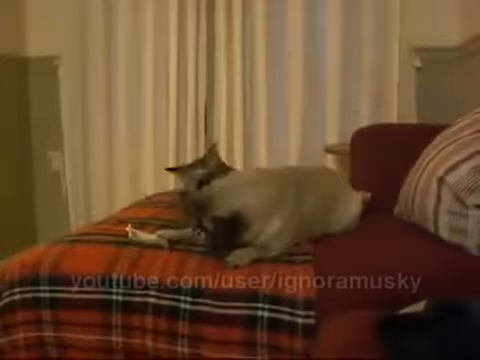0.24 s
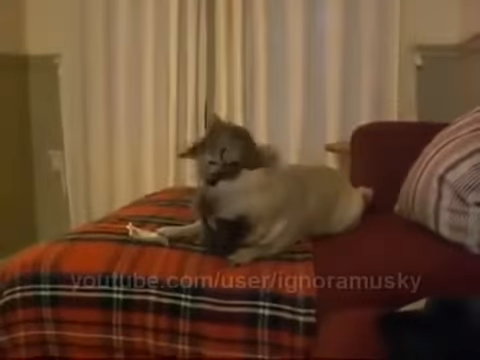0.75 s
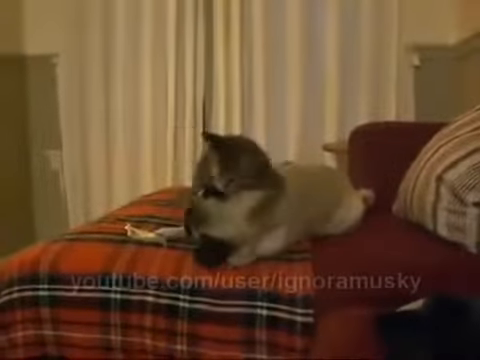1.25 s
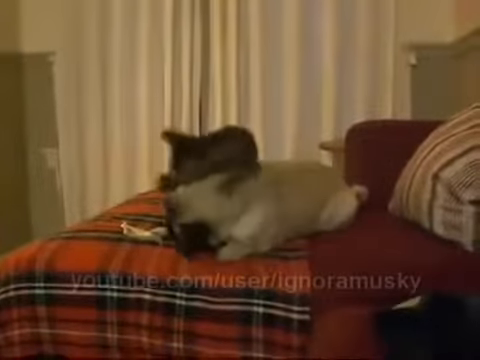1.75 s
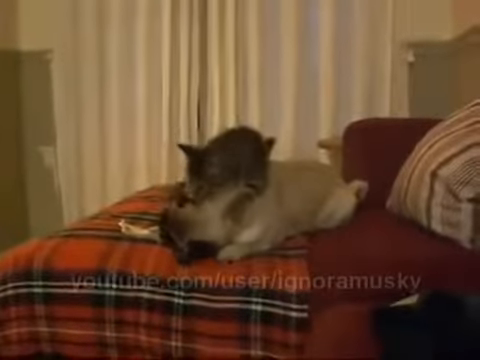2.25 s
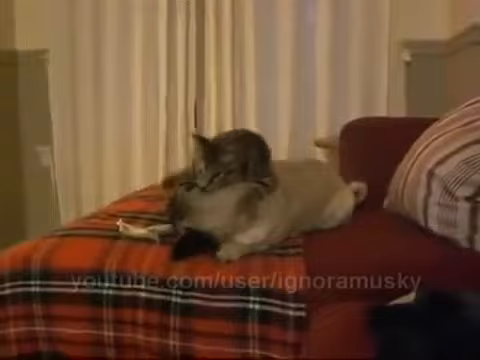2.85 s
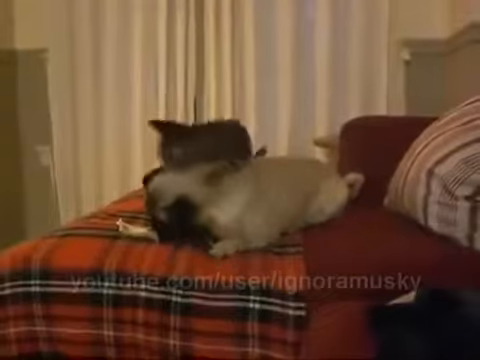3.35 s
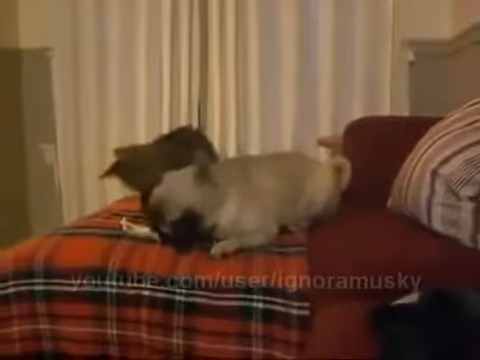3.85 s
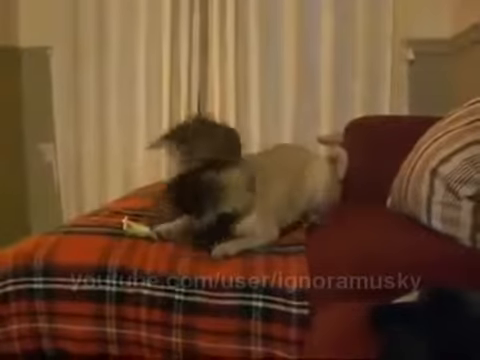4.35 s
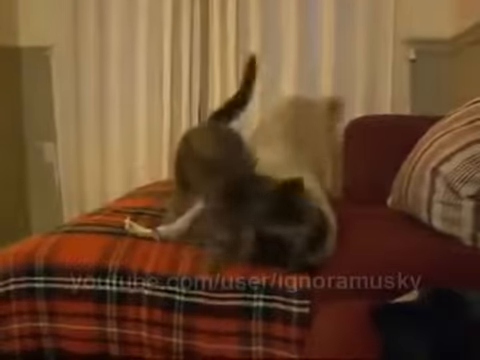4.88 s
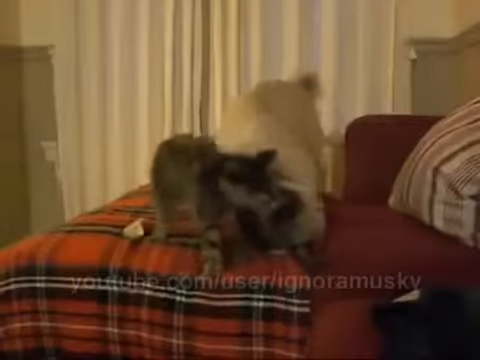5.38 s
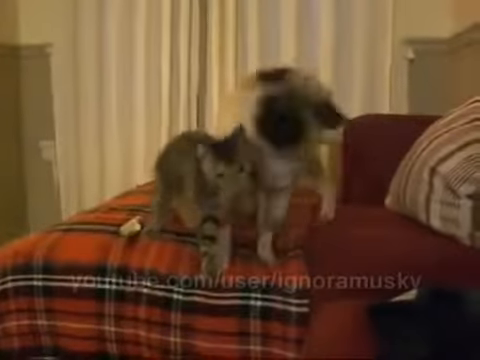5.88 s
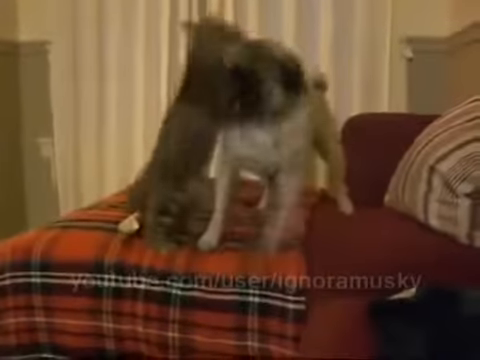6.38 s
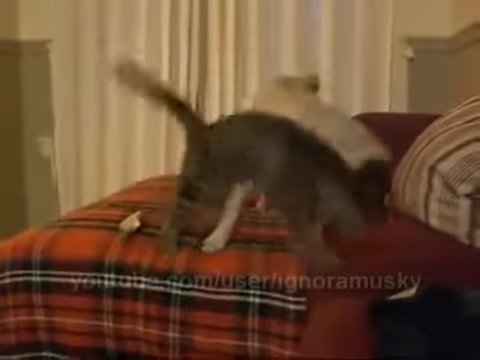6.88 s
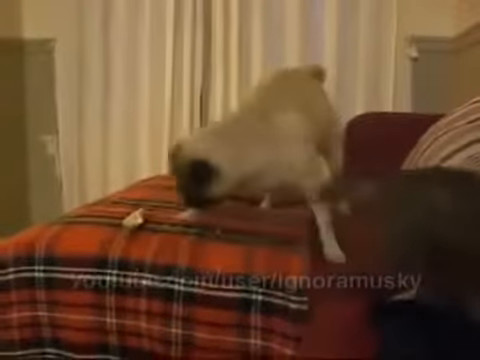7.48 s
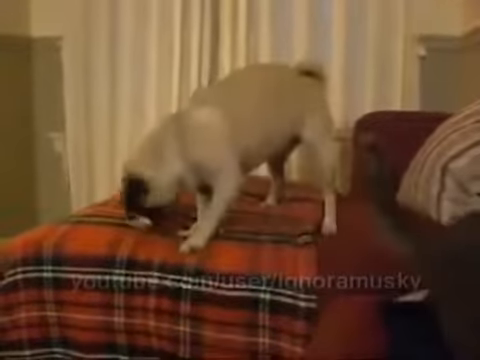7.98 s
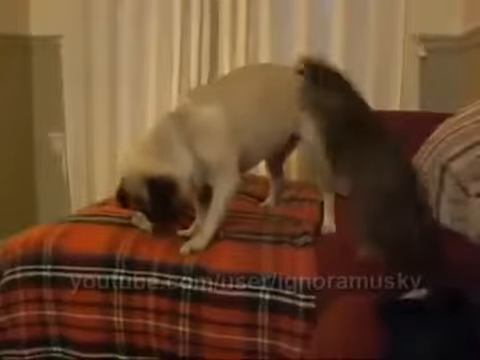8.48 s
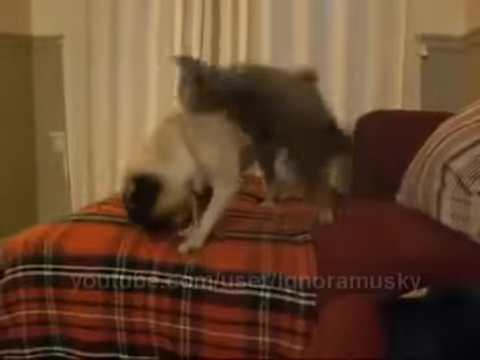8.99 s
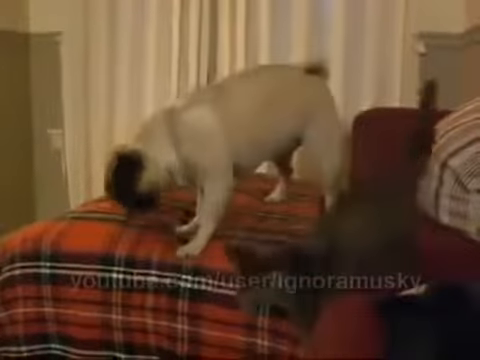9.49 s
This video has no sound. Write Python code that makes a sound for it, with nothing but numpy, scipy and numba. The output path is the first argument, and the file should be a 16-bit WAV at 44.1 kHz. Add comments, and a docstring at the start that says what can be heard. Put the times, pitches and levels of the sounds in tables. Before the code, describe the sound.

A brief hiss opens onto a cluster of low, fluttering cat growls. Quieter, sparser growling follows, then a snarl that thins to a whine and wavering moan. A louder yowl swells and sinks, a gap follows, and a last yowl breaks sharply upward. Lip smacks, ticks and soft thuds dot the scuffle. The microphone is a few steps away in a small living room with low hum.

```python
"""An opening hiss, short growls and three long yowls: a cat and a small dog wrestle on a living-room sofa.
Each call is a rough low tone, chopped by a throat flutter, that turns into a rasping snarl as the jaw opens:
pulses and chopped air drive throat and mouth resonances. Coloured noise makes the hiss, the lip smacks and
short ticks with soft thuds, some at the starts of calls. The hiss falls away, then returns very faintly.
Reflections surround the scuffle; the room hums quietly."""
import sys
import numpy as np
from scipy import signal
from scipy.fft import rfft, irfft, next_fast_len
from scipy.io import wavfile
from scipy.ndimage import uniform_filter1d, map_coordinates
from numba import njit

SR = 44100
rng = np.random.default_rng(int(sys.argv[2]) if len(sys.argv) > 2 else 0)


def generate_wav(sig):
    """Save sig (samples, or channels by samples) to the path in sys.argv[1] as 16-bit PCM at SR."""
    pcm = np.round(np.clip(np.atleast_2d(sig).T, -1, 1) * 32767).astype(np.int16)
    wavfile.write(sys.argv[1], SR, pcm)


N = 429093

WAVER, WAVER_PER_S = 0.048, 13  # jaw and tongue tremble: share of the resonance, curve knots per second
WHINE_SHARE = 0.91  # share of the rasp that a fully raised tongue would turn into a whine, before the limit
FOCUS_MUTES_DB = 23  # a raised tongue shuts off the throat's sound
SNAP_DB = 4  # height of a flap's burst at full roughness
# Pressing harder stiffens the throat. Each row: effort in dB, share of the flutter left.
FLUTTER_LEFT = [(-19, 1), (-15.5, .4)]


def growl():
    """Source-filter principle: fold pulses and chopped air excite the resonances of throat and mouth."""
    (effort_db, opening, pitch_hz, rough, mouth_hz, focus,
     extra_rasp_db, throat_hz, extra_throat_db) = voice_controls()
    rough, focus, narrow = np.clip([rough, focus, WHINE_SHARE * focus ** 2], 0, .95)
    chest_db, throat_db, mouth_db, rasp_db = jaw_balance(effort_db, opening)
    throat_db = throat_db + extra_throat_db - FOCUS_MUTES_DB * focus ** 2
    rasp_db = rasp_db + extra_rasp_db
    throat_hz = throat_hz * np.exp(WAVER * wobble(WAVER_PER_S))
    # a raised tongue holds still
    mouth_hz = mouth_hz * np.exp(WAVER * (1 - focus) * wobble(WAVER_PER_S))

    flaps, bursts = flutter(rate=30, scatter=.17)
    flutter_left = np.interp(effort_db, *np.transpose(FLUTTER_LEFT))
    flaps, bursts = flutter_left * flaps, flutter_left * bursts
    snap_db = SNAP_DB * rough * bursts

    cycles = fold_cycles(pitch_hz, rough, flaps)
    air = chopped_air(cycles)
    source = fold_source(cycles, air, rough, flaps)
    chest = chest_tone(cycles, air, pitch_hz, rough, flaps) * amp(chest_db)
    throat = resonance(source, throat_hz, width_hz=260) * amp(throat_db)
    mouth = mouth_sound(source, throat_hz, mouth_hz, throat_db, mouth_db, focus)
    rasp = snarl_rasp(source, cycles, flaps, mouth_hz, narrow) * amp(rasp_db)
    return chest + throat + mouth * amp(0.5 * snap_db) + off_sofa(rasp * amp(snap_db))


# Short growls. Each row: start in seconds, attack in seconds, length in seconds, release in seconds,
# effort in dB, sag over the length in dB, jaw opening 0-1, pitch in Hz, roughness 0-1, mouth resonance in Hz,
# focus 0-1 (how far the tongue narrows the mouth to a ring), extra rasp in dB, throat resonance in Hz,
# extra throat in dB.
SHORT_GROWLS = [ (0.158, 0.13, 0.15, 0.6, -23, -1.5, 0.57, 168, 0.58, 834, 0.1, 4.5, 416, -5),
                (0.439, 0.25, 0.092, 0.22, -21, 4.5, 0.67, 170.8, 0.63, 1013, 0.08, 0, 377, -5.5),
                (0.634, 0.13, 0.15, 0.37, -17.5, 6, 0.61, 200.2, 0.67, 1023, 0.23, 2, 413, 1),
                (0.9146, 0.003, 0.065, 0.12, -16, 3.5, 0.73, 156.2, 0.44, 927, 0.73, -2, 390, 7.5),
                (0.996, 0.06, 0.045, 0.18, -20, 2.5, 0.4, 160, 0.48, 1040, 0.35, 4, 360, -4.5),
                (1.154, 0.09, 0.6, 0.15, -41, 1.5, 0.91, 165.4, 0.75, 1300, 0.08, -3.5, 390, -6),
                (2.24, 0.021, 0.36, 0.13, -27.5, -3, 0.44, 211.9, 0.43, 855, 0.43, -0.5, 440, 0.5),
                (2.75, 0.12, 0.12, 0.37, -17.5, -0.5, 0.83, 207.9, 0.64, 930, 0.19, -4, 404.3, 1),
                (2.901, 0.091, 0.13, 0.7, -18, 4.5, 0.53, 362, 0.58, 900.3, 0.31, -0.5, 385.9, -1),
                (3.101, 0.09, 0.26, 0.19, -26, 4, 0.89, 190.1, 0.64, 1024, 0.2, -5.5, 387, 0),
                (3.88, 0.18, 0.27, 0.14, -19.5, -1.5, 0.32, 243.9, 0.38, 1000, 0.46, -0.5, 352, -4),
                (6.046, 0.064, 0.108, 0.011, -27.5, 0, 0.32, 275, 0.3, 1130, 0.36, -3.5, 469.7, 1.5),
                (8.155, 0.093, 0.35, 0.061, -21, 2, 0.26, 221.7, 0.43, 960.3, 0.21, -2.5, 505, 5),
                (8.56, 0.081, 0.051, 0.26, -28, 2, 0.18, 205.6, 0.42, 978.7, 0.22, 4, 460.7, 4.5),
                (9.495, 0.046, 0.062, 0.17, -26, -1, 0.82, 234.6, 0.72, 919.8, 0.12, 3, 491, 2.5),
                (9.594, 0.14, 0.12, 0.21, -19.5, -1.5, 0.52, 243.3, 0.46, 962.4, 0.2, 0.5, 410, -0.5), ]
# Three yowls, each a gesture: a snarl that narrows to a whine and trails off as a wavering moan; a call whose
# jaw opens twice as the pitch climbs and sinks; a low growl that breaks upward by nearly an octave.
# Each row: time in seconds, effort in dB, jaw opening 0-1, pitch in Hz, roughness 0-1, mouth resonance in Hz,
# focus 0-1, extra rasp in dB, throat resonance in Hz, extra throat in dB.
LONG_YOWLS = [
    [(4.29, -23, 0.61, 240.5, 0.58, 920, 0.3, 3, 521, -2),
     (4.345, -18, 0.82, 252.4, 0.56, 915, 0.2, -6, 480, 4),
     (4.46, -19, 0.65, 248.9, 0.52, 1050, 0.48, -3.5, 434, 5),
     (4.53, -23.5, 0.6, 248.5, 0.74, 1110, 0.65, 1, 405, 0),
     (4.68, -24, 0.73, 245.1, 0.87, 1150, 0.39, 1, 343, -1),
     (4.84, -35, 0.45, 235.5, 0.48, 1209, 0.34, 3, 339.8, -5),
     (4.91, -27.5, 0.29, 245, 0.43, 1329, 1, 7, 330, -4),
     (4.97, -23, 0.24, 268.3, 0.25, 1350, 0.97, 4.5, 330, -9),
     (5.065, -28, 0.37, 258.8, 0.27, 1320, 1, -2, 320, -10),
     (5.1, -33, 0, 222, 0.26, 1320, 0.39, 4, 320, -2),
     (5.21, -30.5, 0.21, 250.1, 0.33, 1521, 0.93, 3.5, 322.4, -18),
     (5.4, -41.5, 0.27, 193.4, 0.45, 1608, 0.99, 5, 328.8, -2),
     (5.55, -32.5, 0.1, 213.1, 0.3, 1648, 0.78, 2.5, 348, 2),
     (5.74, -31.5, 0.01, 242.2, 0.17, 1600, 0.6, -15, 350, -11.5),
     (5.88, -39, 0.02, 273.5, 0.18, 1565, 0.66, -33, 343, -14)],
    [(6.34, -24, 1, 262.7, 0.45, 1005, 0.29, -7.5, 541.4, 6.5),
     (6.37, -16, 1, 254.8, 0.6, 1057, 0.3, -2, 490, 1),
     (6.46, -15.5, 0.7, 245.5, 0.59, 979.6, 0.18, -6, 410, -1),
     (6.53, -12.5, 0.46, 270.2, 0.37, 941, 0.28, 1, 384.7, -4),
     (6.62, -13.5, 0.99, 295, 0.78, 890, 0.3, -3.5, 514, 2),
     (6.73, -13.5, 1, 334.5, 0.79, 878, 0.2, -4, 500, -2),
     (6.83, -12.5, 0.59, 312.1, 0.48, 844, 0.27, 0.5, 350, -5.5),
     (6.98, -14, 0.47, 304.2, 0.4, 860.6, 0.24, -7, 340, -10),
     (7.04, -21, 0.57, 299.7, 0.39, 924, 0.41, -7.5, 369.7, 3),
     (7.11, -16, 0.55, 262, 0.71, 925, 0.45, 0.5, 385, 0),
     (7.3, -15.5, 0.4, 261.5, 0.56, 973, 0.47, -5, 348.1, -8),
     (7.38, -19.5, 0.44, 254.7, 0.5, 1018, 0.7, -5.5, 350, -4),
     (7.47, -26.5, 0.34, 226, 0.55, 1006, 0.41, -4, 360.3, -0.5)],
    [(8.72, -25, 0.69, 175, 0.58, 1517, 0.17, -5.5, 459.6, 0),
     (8.775, -16, 0.41, 178, 0.4, 1550, 0.43, -0.5, 470, 0.5),
     (8.82, -17.5, 0.51, 189.2, 0.55, 1529, 0.03, 3, 517, -3),
     (8.84, -17, 0.63, 189.6, 0.61, 1000, 0.14, 1.5, 560, 0),
     (8.9, -14.5, 1, 185.5, 0.67, 975, 0.34, -1.5, 620, 4),
     (8.93, -13, 0.67, 325, 0.52, 908.7, 0.3, -1.5, 621, -0.5),
     (9.03, -13.5, 0.78, 345.2, 0.51, 880, 0.2, -1, 616, -7),
     (9.11, -13, 0.74, 358, 0.71, 915, 0.34, 0.5, 650, 0.5),
     (9.22, -16.5, 0.55, 344.1, 0.67, 880, 0.2, -0.5, 610, -3),
     (9.38, -15.5, 0.58, 390.7, 0.67, 925, 0.61, -5, 558.4, 1),
     (9.44, -23.5, 0.42, 379.2, 0.77, 960, 0.51, -0.5, 450, -4)],
]
YOWL_ATTACK_S, YOWL_RELEASE_S = 0.081, 0.13


def voice_controls():
    """Articulation as control curves: the strongest call sets the effort, all calls' points set the rest."""
    calls = [(growl_gesture(start, length, *rest), attack, release)
             for start, attack, length, release, *rest in SHORT_GROWLS]
    calls += [(yowl, YOWL_ATTACK_S, YOWL_RELEASE_S) for yowl in LONG_YOWLS]
    effort_db = np.max([envelope(*call) for call in calls], axis=0)
    shapes = sorted((s, *shape) for gesture, _, _ in calls for s, _, *shape in gesture)
    return [effort_db, *curves(shapes)]


PITCH_SAG = 0.04  # share by which a growl's pitch starts high and ends low


def growl_gesture(start, length, effort_db, sag_db, opening, pitch_hz, *shape):
    """Declination: effort and pitch drift along a short growl while the mouth holds its shape."""
    return [(start, effort_db, opening, pitch_hz * (1 + PITCH_SAG), *shape),
            (start + length, effort_db - sag_db, opening, pitch_hz * (1 - PITCH_SAG), *shape)]


FADE_DB = 29  # a call rises from, and dies to, this far below its effort


def envelope(gesture, attack_s, release_s):
    """Exponential onset and decay: effort is linear in dB, with silence outside the call."""
    s, db = np.transpose(gesture)[:2]
    times = [s[0] - attack_s, *s, s[-1] + release_s]
    levels = [db[0] - FADE_DB, *db, db[-1] - FADE_DB]
    return np.interp(np.arange(N) / SR, times, levels, left=-np.inf, right=-np.inf)


# Balance at three jaw openings. Columns: chest tone, throat, mouth and rasp, each in dB against the effort.
SHUT_BALANCE = (-1.5, -18.5, -26.5, -24)
HALF_OPEN_BALANCE = (-3, -4, -9.5, -15)
WIDE_BALANCE = (-9, -2.5, -2.5, -7)


def jaw_balance(effort_db, opening):
    """Radiation through the jaw: opening it moves the sound from the chest into the mouth."""
    parts = zip(SHUT_BALANCE, HALF_OPEN_BALANCE, WIDE_BALANCE)
    return [effort_db + np.interp(opening, [0, .5, 1], part) for part in parts]


SNAP_LIFE, SNAP_SCATTER = 0.26, 0.65  # a burst's decay as a share of its flap, spread of heights


def flutter(rate, scatter):
    """Relaxation oscillation: loose tissue flaps unevenly, opening fast with a burst and closing slowly."""
    turns = np.cumsum(rate * np.exp(scatter * wobble(25))) / SR
    sizes = np.abs(1 + SNAP_SCATTER * rng.standard_normal(size=1000))
    bursts = sizes[turns.astype(int)] * np.exp(-(turns % 1) / SNAP_LIFE)
    flaps = np.sin(2 * np.pi * turns) + 0.083 * np.sin(4 * np.pi * turns)
    return flaps, bursts - bursts.mean()


def fold_cycles(pitch_hz, rough, flaps):
    """Frequency modulation: the pitch jitters with roughness and lifts a little on each flap."""
    jitter = rough * (.12 * wobble(220) + .05 * wobble(45))
    return np.cumsum(pitch_hz * np.exp(jitter + .015 * flaps)) / SR


CHOP_DB = 5  # depth to which the folds chop the air


def chopped_air(cycles):
    """Amplitude modulation: the folds chop turbulent air once a cycle."""
    return unit(rng.standard_normal(N) * amp(CHOP_DB * np.cos(2 * np.pi * cycles)))


LIMP_DB = 3.5  # strong and weak beats alternate by this swing either way, at full roughness


def fold_source(cycles, air, rough, flaps):
    """Glottal excitation: uneven pulses give way to chopped air as roughness grows, with a subharmonic limp."""
    pulses = unit(np.diff(np.floor(cycles), prepend=0) * amp(4.7 * wobble(250)))
    mix = np.sqrt(1 - rough ** 3) * pulses + rough ** 1.5 * air
    limp_db = LIMP_DB * rough * np.cos(np.pi * cycles)
    return mix * amp(2.6 * flaps + 1.4 * wobble(90) + limp_db)


RAGGED = 1.33  # ragged cycles beside the clean chest tone, at full roughness


def chest_tone(cycles, air, pitch_hz, rough, flaps):
    """Fundamental vibration: a sine throbs with each flap, blurred by noise at the pitch and in a low band."""
    tone = np.sqrt(2) * np.sin(2 * np.pi * cycles)
    blur = resonance(air, pitch_hz, width_hz=183)
    low_band = coloured(air, [(60, -24.0), (110, -13.0), (155, 21), (220, 13.0), (400, -79.0)])
    ragged = 1.41 * blur + 0.78 * low_band
    throb = amp(4.6 * flaps + 1.2 * wobble(80))
    return even((tone + RAGGED * rough * ragged) * throb)


PALATE_HZ, PALATE_WIDTH_HZ, PALATE_DB = 1224, 263, -5  # the open mouth's steady resonance, width per pass


def mouth_sound(source, throat_hz, mouth_hz, throat_db, mouth_db, focus):
    """Formant resonance: the open mouth gives way to one focused ring as the tongue rises."""
    # the back of the mouth rings between the throat and the front
    back = resonance(source, np.sqrt(throat_hz * mouth_hz), width_hz=120)
    back = back * amp((throat_db + mouth_db) / 2 - 10.0)
    palate = resonance(source, PALATE_HZ, PALATE_WIDTH_HZ) * amp(mouth_db + PALATE_DB)
    ring = resonance(source, mouth_hz, width_hz=190) * amp(mouth_db + 4.0)
    return (back + palate) * np.sqrt(1 - focus) + ring * np.sqrt(focus)


# Upper mouth resonances. Each row: frequency in Hz, width of each filter pass in Hz, level in dB.
UPPER_RESONANCES = [(1970, 890, -23), (2820, 260, -22), (3960, 410, -14)]
# Colour of the spray. Each row: frequency in Hz, relative level in dB.
SPRAY_COLOUR = [(900, -43), (1400, 1), (1800, 3.5), (2300, 0), (3000, -1.5), (4200, -5.5), (5500, -8.5),
                (7000, -12.5), (8800, -29)]
# A raised tongue rings at the teeth. Each row: frequency over the mouth's, width of each filter pass in Hz,
# level in dB.
TEETH_RINGS = [(1.8, 149, -0.5), (2.35, 300, -5.5), (3.0, 329, -9), (3.35, 375, -11)]
NOTCH_HZ, NOTCH_WIDTH_HZ, NOTCH_DB = 1550, 66, -4  # a narrow band dips in the broad rasp


def snarl_rasp(source, cycles, flaps, mouth_hz, narrow):
    """Turbulence and high formants: a broad spitting rasp narrows to a whine at the teeth."""
    upper = np.zeros(N)
    for hz, width_hz, db in UPPER_RESONANCES:
        # spit rattles each upper resonance in its own way
        rattled = source * amp(3.5 * wobble(140))
        upper += resonance(rattled, hz, width_hz) * amp(db + 3.4 * wobble(19))

    spray_db = 0.32 * flaps + CHOP_DB / 2 * np.cos(2 * np.pi * cycles) + 1.6 * wobble(200)
    spray = even(coloured(rng.standard_normal(N) * amp(spray_db), SPRAY_COLOUR))

    def notch(hz):
        """Band rejection: a Gaussian dip in dB."""
        return amp(NOTCH_DB * np.exp(-((hz - NOTCH_HZ) / NOTCH_WIDTH_HZ) ** 2))

    broad = filtered(upper + amp(1.5) * spray, notch)
    whine = even(sum(resonance(source, ratio * mouth_hz, width_hz) * amp(db)
                     for ratio, width_hz, db in TEETH_RINGS))
    return np.sqrt(1 - narrow) * broad + np.sqrt(narrow) * whine


# The hiss falls away, then returns as a very faint steady hiss. Each row: time in seconds, level in dB.
HISS_LEVEL = [(0, -29.5), (.12, -30), (.22, -34.5), (.4, -66), (.6, -55)]
# Colour of the hiss. Each row: frequency in Hz, relative level in dB.
TEETH_COLOUR = [(400, -21.5), (900, -7.5), (1500, -4.5), (2400, -3), (4000, -4.5), (5200, -2.5), (6500, -9),
                (8800, -18.5)]


def hiss():
    """Turbulent flow: air forced past bared teeth makes flickering coloured noise."""
    air = rng.standard_normal(N) * amp(1.2 * wobble(90))
    return coloured(air, TEETH_COLOUR) * amp(curves(HISS_LEVEL)[0])


# Lip smacks. Each row: start in seconds, level in dB, centre frequency in Hz.
LIP_SMACKS = [(0.414, -26, 2740), (2.754, -21.5, 3010), (4.0528, -37, 2470), (4.11, -22.5, 3505),
              (4.1425, -26.5, 3000), (4.2737, -35, 2499), (4.4, -23, 3900), (4.483, -29, 3000),
              (4.517, -26, 2920), (4.5464, -26.5, 2990), (4.6053, -25, 3270), (4.637, -22, 3100),
              (4.668, -29, 3506), (6.3561, -20.5, 2000), (8.2365, -32, 3875), (8.2711, -29, 3960),
              (8.3135, -30, 4000), (8.44, -35, 4100), (8.7591, -29, 3601), (8.8087, -20, 2850),
              (9.3203, -20, 2000), (9.4913, -26, 2887)]
SMACK_RISE_S, SMACK_T60_S = 0.0003, 0.033
SMACK_OCTAVES = 0.48  # half-width of the band


def smacks():
    """Impulsive excitation: wet lips and teeth crack open, each click a decaying band of noise."""
    out, t = np.zeros(N + SR), np.arange(SR // 20) / SR
    hz = np.fft.rfftfreq(len(t), 1 / SR) + 1
    for s, db, centre_hz in LIP_SMACKS:
        band = 1 / (1 + (np.log2(hz / centre_hz) / SMACK_OCTAVES) ** 4)
        click = unit(irfft(rfft(rng.standard_normal(len(t))) * band, len(t)))
        decay = amp(db - 60 * t / SMACK_T60_S) * (1 - np.exp(-t / SMACK_RISE_S))
        out[round(s * SR):][:len(t)] += click * decay
    return out[:N]


# Short ticks with soft thuds, some at the starts of calls.
# Each row: start in seconds, tick level in dB, thud over the tick in dB.
TICKS_AND_THUDS = [(0.912, -30, 8), (2.079, -34, -14), (2.24, -43, 15), (3.304, -24, -1), (3.3588, -26, -1),
                   (3.658, -25.5, -7.5), (3.827, -32, 8), (3.884, -24.5, -1), (4.113, -29.5, -6),
                   (4.144, -25, -12), (4.4815, -28.5, 13), (5.3394, -37, -11), (6.0412, -34.5, 5.5),
                   (6.126, -34, 3), (6.309, -35.5, 7), (6.3362, -26, 4.5), (7.231, -29, 12),
                   (7.69, -35.5, -1), (8.275, -33.5, 14.5), (8.4841, -31.5, 10.5), (8.6986, -34, 7.5)]
TICK_RISE_S = 0.002  # softens the start of each tick


def ticks_and_thuds():
    """Exponential decay: each event is a short dry tick of noise with a longer, lower thud of noise."""
    ticks, thuds, t = np.zeros(N + SR), np.zeros(N + SR), np.arange(SR // 8) / SR
    for s, db, thud_db in TICKS_AND_THUDS:
        first = round(s * SR)
        ticks[first:][:len(t)] += amp(db - 60 * t / 0.053) * (1 - np.exp(-t / TICK_RISE_S))
        thuds[first:][:len(t)] += amp(db + thud_db - 60 * t / 0.17)
    tick = coloured(rng.standard_normal(N), [(700, -24.0), (1900, 18.5), (3800, 7.0), (6000, -1), (8800, -40)])
    thud = coloured(rng.standard_normal(N), [(80, -15.5), (250, 5.0), (700, -3.5), (1500, -15.5), (4000, -72.5)])
    return tick * ticks[:N] + thud * thuds[:N]


def off_sofa(x):
    """Early reflection: what leaves the mouth also glances off the sofa, a hand's width below."""
    return glance(x, delay_s=.00096, swing=.2, echo_db=-12)


def glance(x, delay_s, swing, echo_db):
    """Comb filtering: a reflection's path swings as the heads turn, carving shifting notches."""
    late = np.arange(N) - delay_s * SR * np.exp(np.clip(swing, 0, .3) * wobble(6))
    echo = amp(echo_db) * map_coordinates(x, [late], order=1)
    return (x + echo) / np.sqrt(1 + amp(2 * echo_db))


# Decay of the room. Each row: frequency in Hz, time to fall by 60 dB in seconds.
WALL_DECAY = [(150, 0.51), (1000, 0.44), (8000, 0.061)]


def walls(x, spread):
    """Reverberation: the short answer keeps changing as the animals move, nearly alike in both channels."""
    hop = SR // 4
    padded = np.pad(x, (hop, 2 * hop))
    wet = np.zeros((2, N + 2 * SR))
    for start in range(0, N + hop, hop):
        # each overlapping piece gets a fresh noise tail that dies sooner in the treble
        hz, t, z = signal.stft(rng.standard_normal((2, SR // 3)), SR, nperseg=256)
        decay = amp(-60 * t / along(WALL_DECAY, hz)[:, None])
        tails = signal.istft(z * decay, SR, nperseg=256)[1]
        piece = padded[start:start + 2 * hop] * np.hanning(2 * hop)
        answer = signal.fftconvolve(piece[None], tails / np.linalg.norm(tails[0]), axes=1)
        wet[:, start:start + answer.shape[1]] += answer
    mid, side = wet[:, hop:hop + N]
    return np.array([mid + spread * side, mid - spread * side])


# Colour of the background. Each row: frequency in Hz, relative level in dB.
ROOM_COLOUR = [(25, -36.5), (55, -9), (85, -15.5), (120, 1), (200, -1.5), (300, -4), (500, -9.5),
               (800, -13.5), (1300, -16), (2200, -24), (4000, -33), (6500, -35), (8800, -54)]


def room_tone():
    """Ambient noise: steady noise, a wavering mains hum and faint low noise that swells and fades."""
    steady = coloured(rng.standard_normal(N), ROOM_COLOUR) * amp(-37.0)
    hum_cycles = np.cumsum(119 + 3 * wobble(11)) / SR
    hum = np.sin(2 * np.pi * hum_cycles) * amp(-41.5 + 4.8 * wobble(14.0))
    low_noise = coloured(rng.standard_normal((2, N)),
                         [(25, -17.0), (55, -9.0), (80, 3.0), (150, -24.0), (400, -67.5)])
    swelling = low_noise * amp(-52.0 + 13.5 * np.tanh(2 * wobble(11)))
    apart = coloured(rng.standard_normal((2, N)), ROOM_COLOUR) * amp(-40.0)
    # the second channel is a little louder
    background = (steady + hum + apart) * amp([[-.6], [.6]])
    wide_swelling = swelling[0] + amp(-3.5) * swelling[1] * np.array([[1], [-1]])
    return background + wide_swelling * amp([[-1.6], [1.6]])


def amp(db):
    """Logarithmic level: decibels to gain."""
    return 10 ** (np.asarray(db) / 20)


def unit(x):
    """Mean power: scaled to rms 1."""
    return x / np.sqrt(np.mean(x ** 2) + 1e-20)


def even(x):
    """Short-time power: held near rms 1 from moment to moment, so that fast flutter stays."""
    power = uniform_filter1d(uniform_filter1d(x * x, size=2200), size=1500)
    return x / np.sqrt(np.abs(power) + 1e-12)


def along(points, hz):
    """Logarithmic frequency: (Hz, value) points read on a log axis."""
    f, v = np.transpose(points)
    return np.interp(np.log(hz + 1), np.log(f + 1), v)


def curves(rows):
    """Linear interpolation: one value per sample for each column after the time."""
    s, *cols = np.transpose(rows)
    return [np.interp(np.arange(N) / SR, s, c) for c in cols]


def wobble(rate):
    """Band-limited fluctuation: a smooth random curve with rate knots a second."""
    knots = rng.standard_normal(int(N * rate / SR) + 4)
    return map_coordinates(knots, [np.arange(N) * rate / SR])


def filtered(x, response):
    """Linear filtering: the spectrum of x times a response of frequency."""
    m = next_fast_len(N + SR // 2)
    return irfft(rfft(x, m) * response(np.fft.rfftfreq(m, 1 / SR)), m)[..., :N]


def coloured(x, spectrum):
    """Spectral shaping: x through a (Hz, dB) spectrum, at rms 1."""
    return unit(filtered(x, lambda hz: amp(along(spectrum, hz))))


@njit
def two_pole(x, angle, radius):
    """Damped oscillation: a resonator whose frequency moves."""
    y = np.zeros(len(x))
    for i in range(2, len(x)):
        y[i] = x[i] - x[i - 2] + 2 * radius * np.cos(angle[i]) * y[i - 1] - radius * radius * y[i - 2]
    return y


def resonance(x, centre_hz, width_hz):
    """Cascaded resonance: a fixed or moving resonator applied twice, for steep skirts, then evened."""
    angle = np.full(N, 2 * np.pi / SR) * centre_hz
    radius = np.exp(-np.pi * width_hz / SR)
    return even(two_pole(two_pole(x, angle, radius), angle, radius))


def scene():
    """Superposition: the scuffle with an early answer from the wall behind, its reverberation and the room."""
    sources = growl() + off_sofa(hiss()) + ticks_and_thuds() + smacks()
    scuffle = glance(sources, delay_s=.009, swing=0.1213, echo_db=-10.5)
    return amp(0.5) * scuffle + amp(-7.0) * walls(scuffle, spread=0.012) + room_tone()


TOP_HZ = 8850  # upper band limit


def record(dry):
    """Saturation and band limiting: the highest peaks are rounded off and the top treble is cut steeply."""
    rounded = dry / (1 + np.abs(dry / .72) ** 4) ** (1 / 4)
    return filtered(rounded, lambda hz: 1 / np.sqrt(1 + (hz / TOP_HZ) ** 160))


dry = scene()
out = record(dry)
generate_wav(out)
```